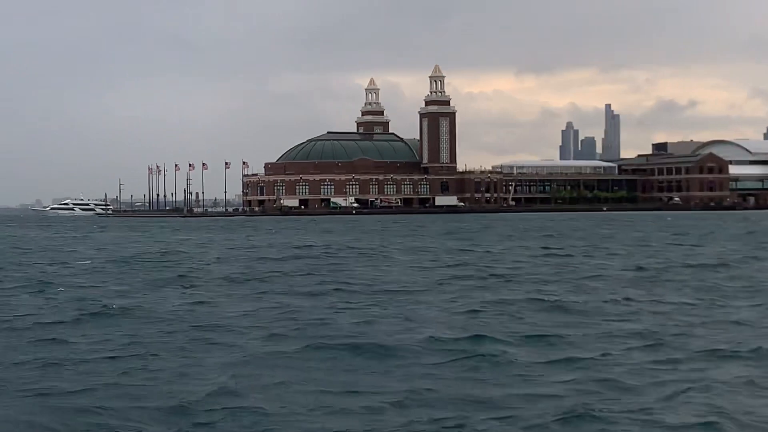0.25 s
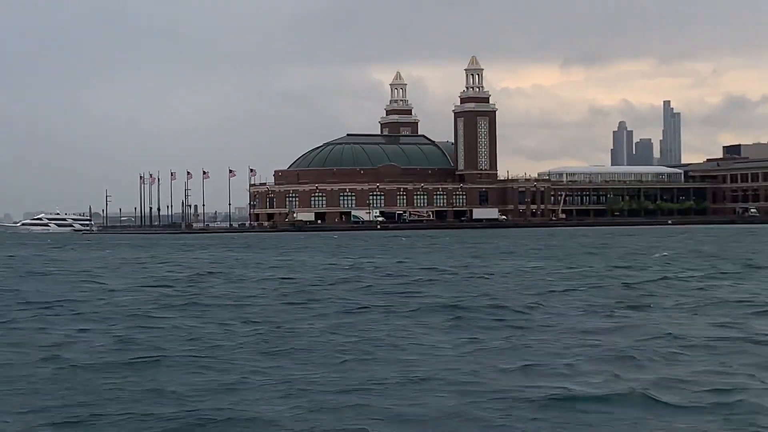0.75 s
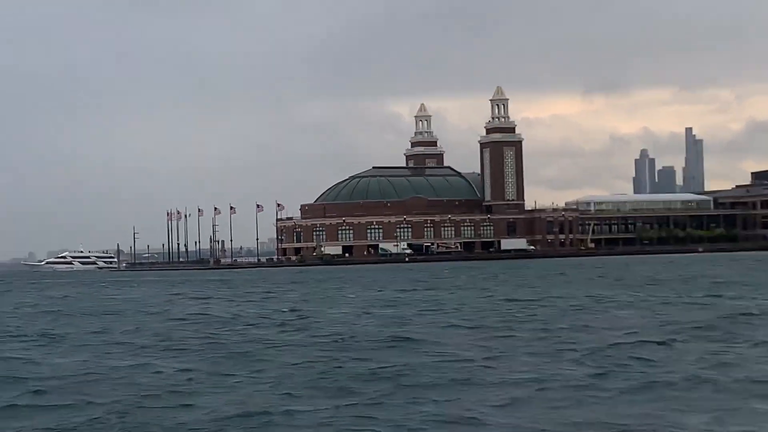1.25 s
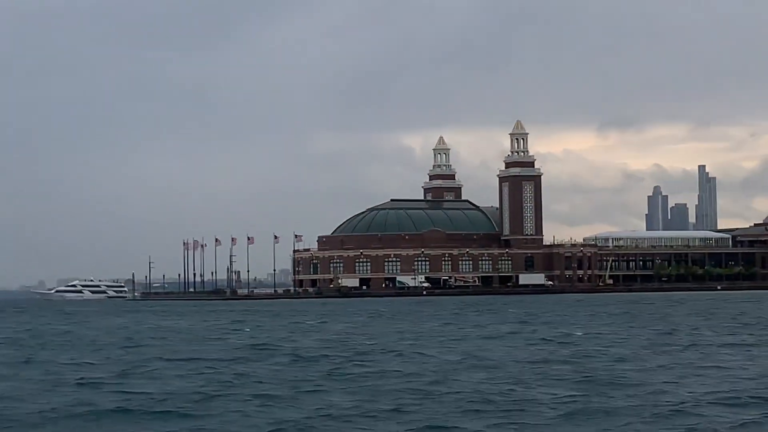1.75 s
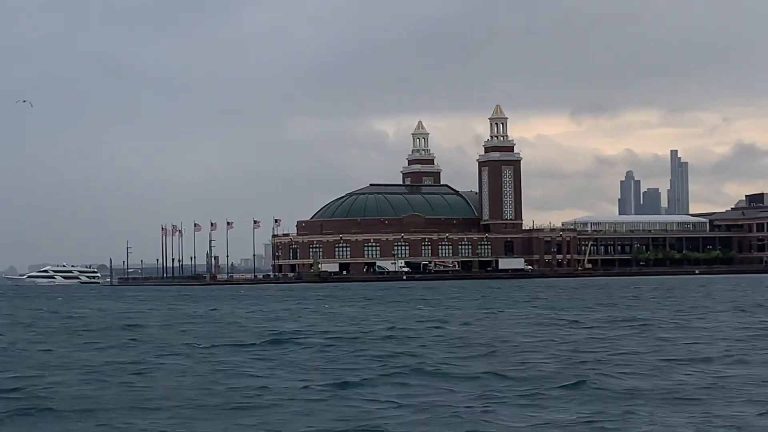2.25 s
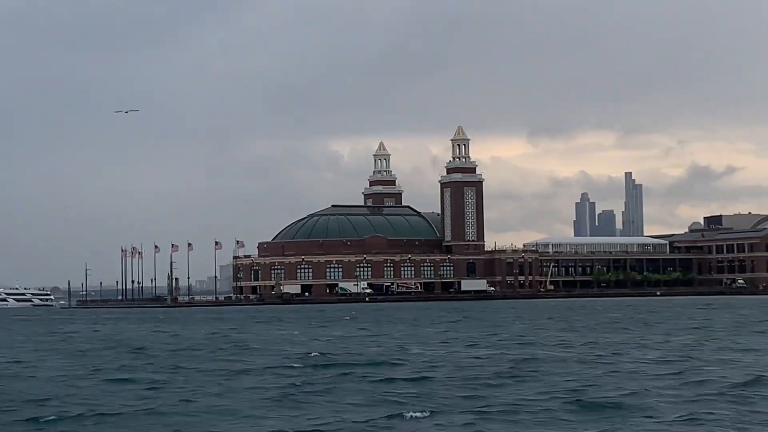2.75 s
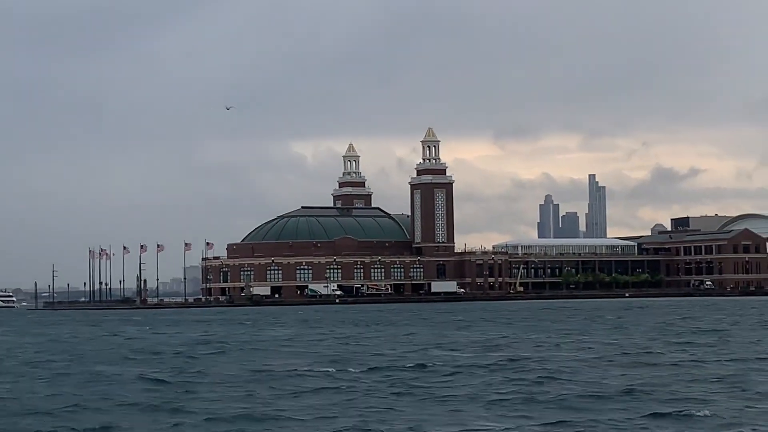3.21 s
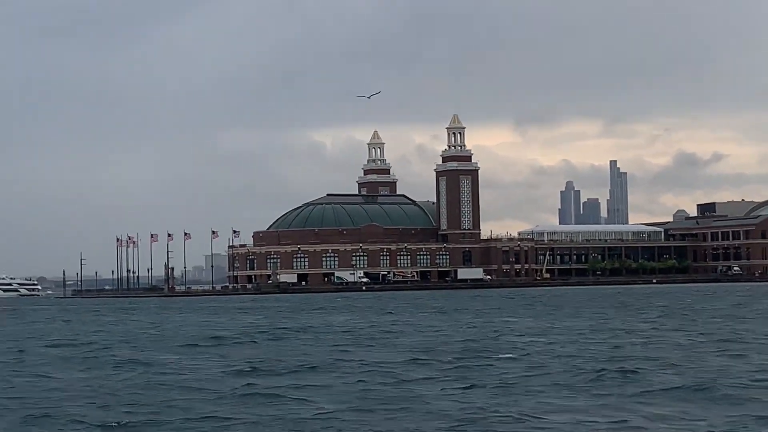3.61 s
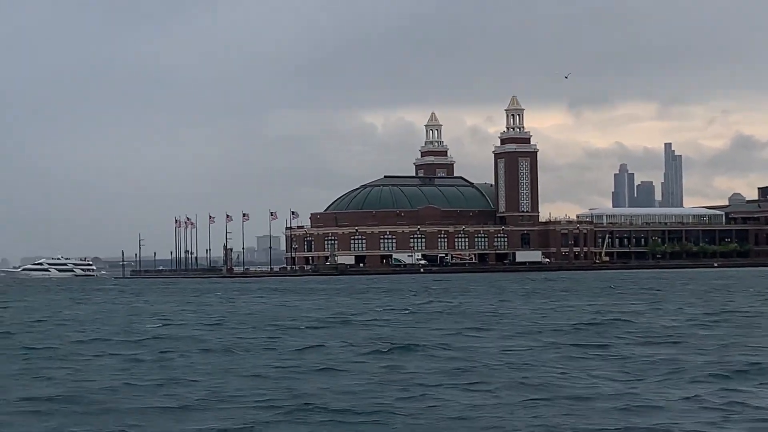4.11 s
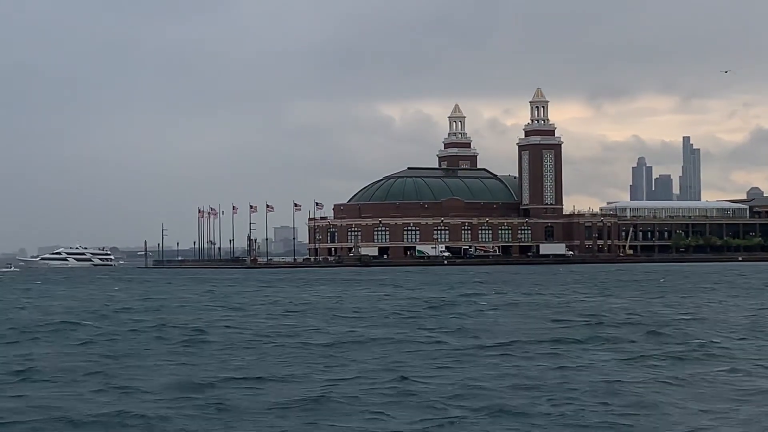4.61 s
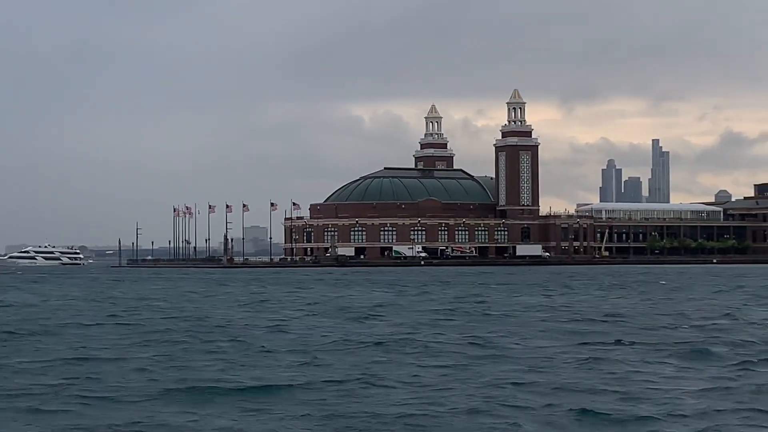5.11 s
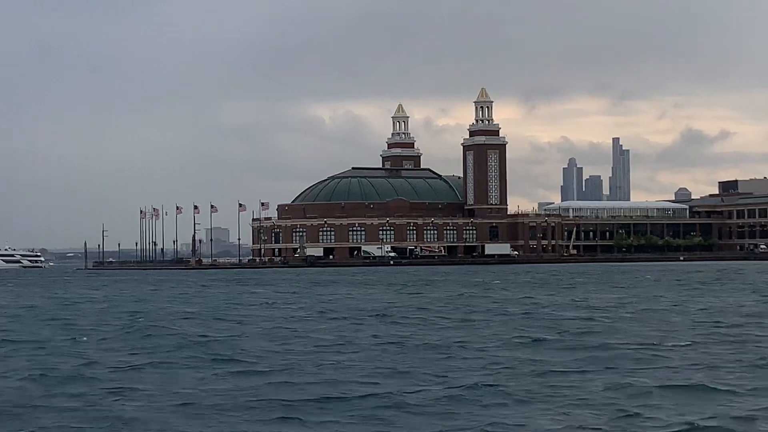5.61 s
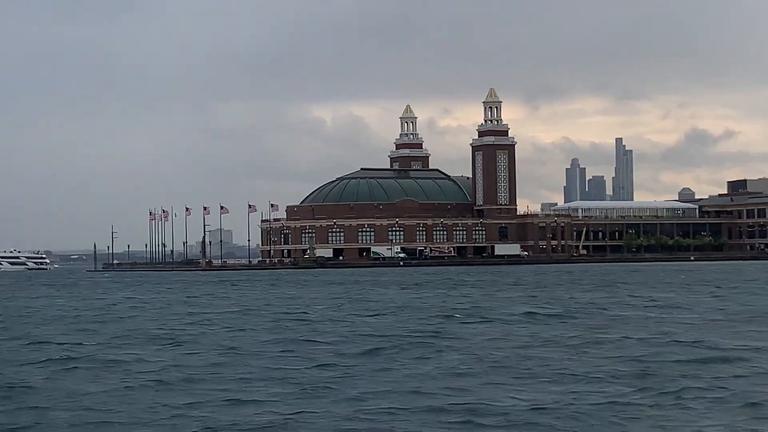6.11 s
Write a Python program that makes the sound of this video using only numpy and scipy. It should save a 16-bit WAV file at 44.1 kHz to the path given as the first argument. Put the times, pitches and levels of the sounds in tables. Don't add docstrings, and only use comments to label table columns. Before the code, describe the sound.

On an open boat deck, wind strikes a phone microphone directly: dense low thumps, flaps and small rattling crackles for about three seconds. The gusts then thin out, uncovering the dull rush of water along the hull, bright spray swelling with each wave, and a faint steady drive whine. A big splash comes past five seconds, then one last deep gust near the end.

```python
import sys
import numpy as np
from scipy import signal
from scipy.fft import rfft, irfft
from scipy.io import wavfile
from scipy.ndimage import uniform_filter1d

SR = 44100
rng = np.random.default_rng(int(sys.argv[2]) if len(sys.argv) > 2 else 0)


def to_linear_factor(level_db):
    exponent = np.asarray(level_db, float) / 20
    return 10 ** exponent


def master_out(mix):
    frames = np.transpose(np.atleast_2d(mix))
    ceiling = np.clip(frames, -1, 1)
    pcm = np.round(ceiling * 32767).astype(np.int16)
    wavfile.write(sys.argv[1], SR, pcm)


N = 280254


def evened(x):
    return x / np.sqrt(np.mean(x ** 2) + 1e-20)


def read(points, hz):
    f, value = np.transpose(points)
    return np.interp(np.log(hz + 1), np.log(f + 1), value)


def curve(rows):
    return np.interp(np.arange(N) / SR, *np.transpose(rows))


def chance(low_hz, high_hz):
    hz = np.fft.rfftfreq(N, 1 / SR)
    shape = (hz > low_hz) / (1 + (hz / high_hz) ** 2)
    return evened(irfft(rfft(rng.standard_normal(N)) * shape, N))


def turbulence(colour, same):
    a, b = rng.standard_normal((2, N))
    pair = np.array([a, same * a + np.sqrt(1 - same ** 2) * b])
    gain = to_linear_factor(read(colour, np.fft.rfftfreq(N, 1 / SR)))
    return evened(irfft(rfft(pair) * gain, N))


# t/s, level/dB
WIND_STRENGTH = [(0.0, -25.5), (0.88, -31.5), (1.09, -29.5), (1.38, -30), (1.82, -31), (1.98, -28.5),
                 (2.21, -39), (2.49, -34), (2.88, -35.5), (3.4, -33), (3.87, -35.5), (4.88, -35.5),
                 (5.02, -35), (5.45, -38), (5.64, -37), (5.91, -28.5), (6.05, -33), (6.35, -40.5)]
WIND_MEAN_DB = -35
# f/Hz, density/(dB per Hz)
RUMBLE_COLOUR = [(12, -23), (32, -3), (47, 5.5), (62, 6), (100, 2.5), (135, -1.5), (240, -38.5), (900, -90)]
ROAR_COLOUR = [(80, -6.5), (160, 1), (230, -0.5), (330, -4.5), (480, -11.5), (1100, -41), (4000, -92)]


def wind():
    flutter = chance(5.2, 50)
    wind_db = curve(WIND_STRENGTH)
    rumble_db = wind_db + 0.2 + 1.2 * flutter
    roar_db = WIND_MEAN_DB - 6.0 + 0.86 * (wind_db - WIND_MEAN_DB) + 2.7 * flutter
    rumble = to_linear_factor(rumble_db) * turbulence(RUMBLE_COLOUR, same=0.93)
    roar = to_linear_factor(roar_db) * turbulence(ROAR_COLOUR, same=0.94)
    return rumble + roar


# t/s, thump level/dB, flap over thump/dB, length/s
LARGE = [(0.108, -28.5, -4, 0.015), (0.187, -29.5, 2.5, 0.026), (0.218, -35, -1, 0.0072),
         (.367, -27, -1, 0.029), (0.421, -27, -4, 0.019), (0.528, -32, 2, 0.025), (0.617, -29, 3, 0.039),
         (.735, -27, -9, 0.045), (0.79, -28.5, -1, .018), (0.914, -24, 1, 0.012), (1.029, -27, -19, .021),
         (1.122, -27, 0, 0.019), (1.168, -24.5, 0, 0.044), (1.246, -27.5, -2.5, 0.041),
         (1.464, -22.5, -4, 0.018), (1.531, -23, -1, 0.022), (1.664, -25, -8, 0.018),
         (1.953, -25.5, -7, 0.05), (2.245, -24.5, -6.5, 0.019), (2.374, -24, -8.5, 0.015),
         (2.531, -23, -6.5, .018), (2.571, -24, -1.5, 0.03), (3.212, -24.5, -3.5, 0.02),
         (3.265, -21.5, -9.5, 0.029), (3.312, -32.5, 4.5, 0.027), (3.763, -29.5, -5.5, 0.072),
         (3.997, -28, -9, 0.068), (5.355, -36, -5.5, 0.04), (5.735, -33, -6.5, 0.065),
         (5.89, -24, -14, 0.047)]


def large_eddies():
    rows = []
    for s, thump_db, flap_over_db, length_s in LARGE:
        flap_db = thump_db + flap_over_db
        rows.append((s, thump_db, flap_db, flap_db - 13, flap_db - 17.5, length_s))
    return rows


# t/s, rattle level/dB, crackle over rattle/dB, length/s
SMALL = [(0.022, -36, -8.5, 0.042), (0.154, -31.5, -10.5, 0.02), (0.26, -41, -16, .026),
         (0.345, -44.5, 0, 0.028), (0.442, -34, -9.5, 0.017), (0.576, -37.5, -9, 0.044),
         (0.883, -34, -11, 0.024), (0.94, -34, -5.5, .011), (1.026, -39.5, 0, 0.02),
         (1.072, -38, 0.5, 0.044), (1.21, -34, -0.8, 0.026), (1.324, -36, -6, 0.031),
         (1.456, -35, 2, 0.025), (1.582, -34.5, -5.5, 0.024), (1.634, -36, -7.5, .014),
         (1.781, -38.5, -5, .04), (1.861, -34.5, -5.5, 0.047), (1.918, -37, -24, 0.015),
         (2.097, -35, -6, 0.0076), (2.435, -35.5, -11, .025), (2.489, -35, -13, 0.04),
         (2.844, -33.5, -9.5, .013), (2.954, -44, 5, 0.023), (3.138, -36, -4, 0.012),
         (4.476, -38.5, -10, 0.047), (4.936, -37.5, -6.5, 0.024), (5.325, -41.5, 0, 0.014),
         (5.781, -39, -8, 0.02), (5.897, -41.5, -11, 0.044), (6.31, -40.5, -18, 0.048)]


def small_eddies():
    rows = []
    for s, rattle_db, crackle_over_db, length_s in SMALL:
        body_db = rattle_db - 0.23 * crackle_over_db
        rows.append((s, body_db + 1, body_db + 2, rattle_db, rattle_db + crackle_over_db, length_s))
    return rows


STRAY_OVER_WIND_DB = [-7.5, -10.5, -8.5, -19.5]


def stray_eddies():
    per_s, spread_db, typical_s = 6, 1.5, 0.025
    count = round(per_s * N / SR)
    luck = rng.standard_normal((count, 5))
    s = (np.arange(count) + rng.random(count)) * (N - 1) / SR / count
    wind_db = np.interp(s, *np.transpose(WIND_STRENGTH))
    levels_db = wind_db[:, None] + STRAY_OVER_WIND_DB + spread_db * luck[:, :4]
    length_s = typical_s * np.exp(0.45 * luck[:, 4])
    return list(np.column_stack([s, levels_db, length_s]))


# f/Hz, density/(dB per Hz)
THUMP_COLOUR = [(20, -15), (50, -7), (75, -0.5), (115, -6.5), (170, -12.5), (300, -29.5), (900, -94)]
RATTLE_COLOUR = [(200, -24), (420, 4), (600, 7.5), (900, 2), (1400, -35), (5000, -96)]
CRACKLE_COLOUR = [(450, -15), (950, -2.5), (1250, -0.5), (1700, -8.5), (2200, -12), (3000, -22),
                  (7000, -92)]


def buffets():
    out = np.zeros((2, N))
    ragged = to_linear_factor(2.2 * chance(25, 90))
    layers = [  # noise, length factor, gain/dB
        (turbulence(THUMP_COLOUR, same=0.88), 2.6, 0.1),
        (turbulence(ROAR_COLOUR, same=0.95), 1.6, 0.8),
        (turbulence(RATTLE_COLOUR, same=0.56) * ragged, 1.35, 0.3),
        (turbulence(CRACKLE_COLOUR, same=0.26) * ragged[::-1], 1.9, 1.5)]
    for s, *levels_db, length_s in large_eddies() + small_eddies() + stray_eddies():
        for db, (noise, stretch, gain_db) in zip(levels_db, layers):
            half = int(length_s * stretch * SR / 2)
            at = np.arange(-half, half) + round(s * SR)
            inside = (at >= 0) & (at < N)
            swell, at = np.hanning(2 * half)[inside], at[inside]
            burst = evened(swell * noise[:, at])
            out[:, at] += to_linear_factor(db + gain_db) * burst * np.sqrt(np.mean(swell ** 2))
    return out


# f/Hz, likeness of the ports (clipped to 0-1)
PORT_LIKENESS = [(700, 2), (1100, 1.7), (1400, 0.63), (2300, 0.13), (3000, 0.6), (3400, 0.2), (4300, 0.46),
                 (4950, 0.5), (5500, 0.47), (6500, 0.4), (7150, 0.46), (8300, .72), (12000, 1.2),
                 (15500, -1)]
# f/Hz, right port lead/rad
PORT_LEAD = [(700, 0), (1080, -1.1), (1400, -.4), (2100, 1.1), (2450, 3.7), (3100, 3.6), (3900, 6.3),
             (4500, 6.2), (5150, 3.1), (6550, .1), (7000, .4), (7600, 2.3), (8500, 3.14), (15700, 12.6)]
# f/Hz, left minus right/dB
PORT_SHADE = [(1500, 0), (2700, -0.5), (4200, -1), (6200, -3), (8000, -0.5)]


def water(colour, patchy_db, flicker_db):
    hop, size = 128, 512
    frames, hz = N // hop + 5, np.fft.rfftfreq(size, 1 / SR)
    a, b, c, d, patches = rng.standard_normal((frames, len(hz), 5)).T
    patches = uniform_filter1d(patches, size=7, axis=0)
    patches = evened(uniform_filter1d(patches, size=24, axis=1))
    flicker = evened(uniform_filter1d(rng.standard_normal(frames), size=5))
    same = np.clip(read(PORT_LIKENESS, hz), 0, 1)[:, None]
    lead = np.exp(1j * np.interp(hz, *np.transpose(PORT_LEAD)))[:, None]
    shade = to_linear_factor(read(PORT_SHADE, hz) / 2)[:, None]
    left = a + 1j * b
    right = same * lead * left + np.sqrt(1 - same ** 2) * (c + 1j * d)
    level_db = read(colour, hz)[:, None] + patchy_db * patches + flicker_db * flicker
    z = np.array([left * shade, right / shade]) * to_linear_factor(level_db)
    return evened(signal.istft(z, nperseg=size, noverlap=size - hop)[1][:, :N])


# crest t/s, spray level/dB, length/s
BOW_WAVES = [(.3, -57, 0.24), (0.79, -56, 0.11), (0.953, -52.5, 0.21), (1.38, -51.5, 0.64),
             (2.167, -51.5, 0.37), (2.547, -63, 0.39), (3.107, -58, 0.49), (3.437, -55.5, 0.59),
             (3.76, -56.5, 0.33), (3.99, -52, 0.24), (4.18, -58, 0.33), (4.45, -52.5, 0.49),
             (5.246, -46.5, 0.58), (5.7, -51.5, 0.42), (5.934, -55, 0.29), (6.135, -54.5, 0.38)]


def wave_strength():
    t = np.arange(N) / SR
    crest_at, calm_db = 0.5, -59
    power = to_linear_factor(calm_db) ** 2 * np.ones(N)
    for s, db, length_s in BOW_WAVES:
        width_s = length_s * np.where(t < s, crest_at, 1 - crest_at)
        power += to_linear_factor(db) ** 2 * np.exp(-2 * ((t - s) / width_s) ** 2)
    return 10 * np.log10(power)


# f/Hz, density/(dB per Hz)
RUSH_COLOUR = [(150, -27), (350, -1.5), (550, 0), (820, 1), (1050, -2), (1300, -4.5), (1750, -6),
               (2000, -12), (2600, -14), (4500, -32), (9000, -90)]
SPRAY_COLOUR = [(500, -2), (1100, -16.5), (1800, 0), (2500, -2), (3200, -1), (5000, -4), (8000, -7.5),
                (11000, -10), (15600, -14.5)]


def bow_wave():
    wave_db = wave_strength()
    droplets_db = 1.3 * chance(150, 900)
    surges_db = 1.2 * chance(1.5, 9)
    gathering_way_db = 0.43 * (np.arange(N) - N / 2) / SR
    rush_db = -42.5 + 0.34 * (wave_db + 52.5) + 0.059 * (curve(WIND_STRENGTH) - WIND_MEAN_DB)
    rush_db += surges_db + gathering_way_db
    rush = to_linear_factor(rush_db) * water(RUSH_COLOUR, patchy_db=0.86, flicker_db=0.56)
    spray = to_linear_factor(wave_db + 5.0 + droplets_db) * water(SPRAY_COLOUR, patchy_db=1.14, flicker_db=0.65)
    return rush + spray


# f/Hz, level/dB, width/Hz
WHINE_LINES = [
    (581, -60, 4),
    (786, -52.5, 3),
    (937, -60, 5),
    (1028, -61, 5),
    (1655, -64, 50),
]
# t/s, level/dB
WHINE_LEVEL = [(0, -9), (2, -8), (3.4, -3), (4.5, 0), (5.6, .5), (6.35, 2.5)]


def whine():
    t, out = np.arange(N) / SR, np.zeros(N)
    for hz, db, width_hz in WHINE_LINES:
        waver_db = 2.0 * chance(0.3, width_hz)
        slip_rad = 0.45 * chance(0.2, width_hz)
        out += to_linear_factor(db + waver_db) * np.sqrt(2) * np.sin(2 * np.pi * hz * t + slip_rad)
    return out * to_linear_factor(curve(WHINE_LEVEL))


def scene():
    return wind() + buffets() + bow_wave() + whine()


# t/s, f/Hz
MONO_EDGE = [(0, 640), (2.0, 650), (2.7, 1010), (3.2, 950), (4.6, 1000), (6.35, 950)]
# f/Hz, level/dB
BODY_COLOUR = [(600, -2.5), (900, -0.5), (1100, 2.5), (1400, -2), (1900, 0)]


def emptied(x, bands, mono=0):
    hz, t, z = signal.stft(x, SR, nperseg=2048)
    hz = hz[:, None]
    for low_hz, high_hz, share, ragged_hz in bands:
        low, high, mood = rng.standard_normal((len(t), 3)).T
        mood = uniform_filter1d(mood, size=4)
        in_band = (hz > low_hz + ragged_hz * low) & (hz < high_hz + ragged_hz * high)
        z = z * ~(in_band & (mood <= np.quantile(mood, share)))
    wander = 1 - 0.2 * rng.random(len(t)) ** 2
    edge_hz = mono * np.interp(t, *np.transpose(MONO_EDGE)) * wander
    z = z * (hz >= edge_hz) * to_linear_factor(mono * read(BODY_COLOUR, hz))
    return signal.istft(z, SR, nperseg=2048)[1][:N]


def roll_off(x):
    return signal.sosfilt(signal.butter(12, 17070, fs=SR, output="sos"), x)


# low f/Hz, high f/Hz, share of time (0-1), raggedness/Hz
SUM_GAPS = [
    (8330, 8870, .74, 120),
    (12650, 14250, .95, 260),
    (15750, 23000, 1, 0),
]
DIFFERENCE_GAPS = [
    (10400, 11650, 1, 50),
    (15150, 23000, 1, 130),
]


def record(dry):
    knee = 0.24
    left, right = knee * np.tanh(dry / knee)
    mid = emptied((left + right) / 2, SUM_GAPS)
    side = emptied((left - right) / 2, DIFFERENCE_GAPS, mono=1)
    return roll_off(np.array([mid + side, mid - side]))


dry = scene()
out = record(dry)
master_out(out)
```